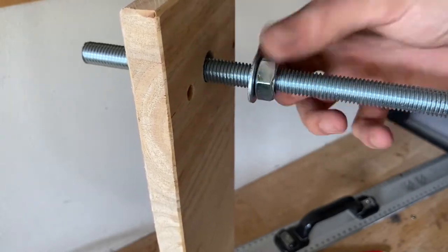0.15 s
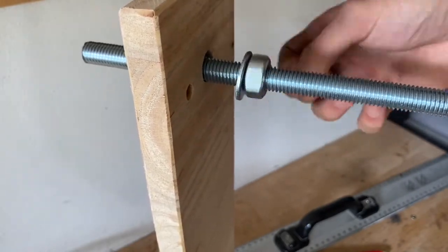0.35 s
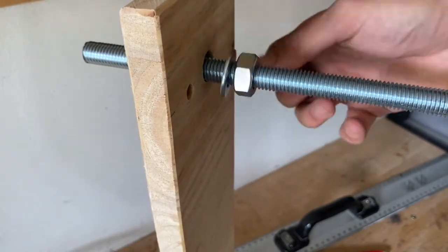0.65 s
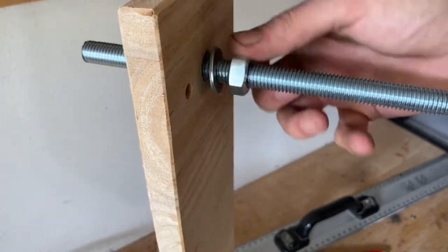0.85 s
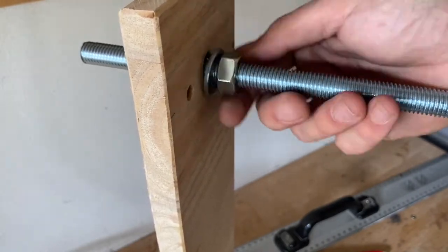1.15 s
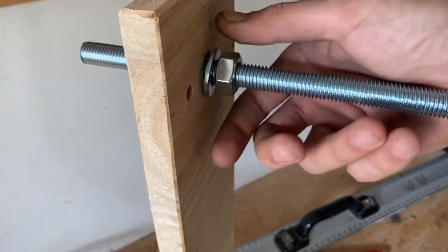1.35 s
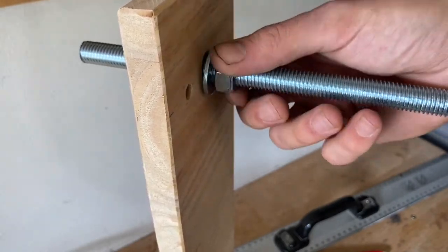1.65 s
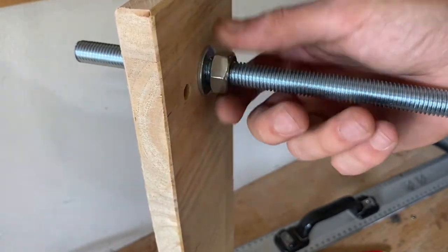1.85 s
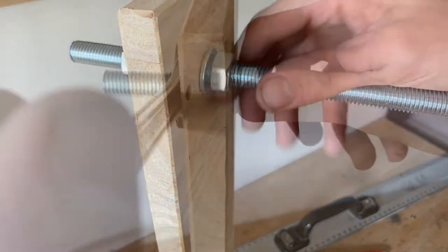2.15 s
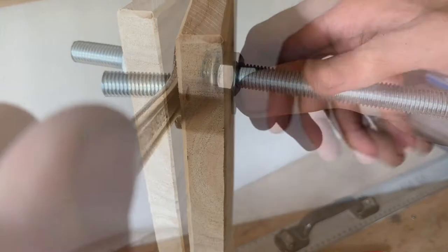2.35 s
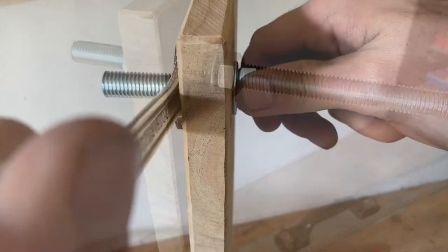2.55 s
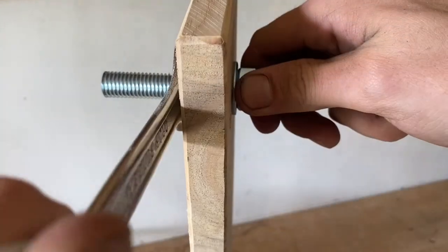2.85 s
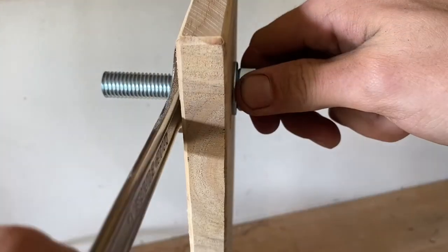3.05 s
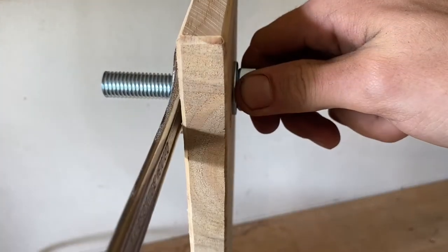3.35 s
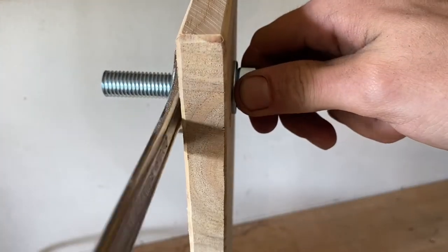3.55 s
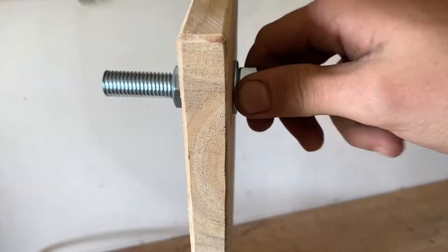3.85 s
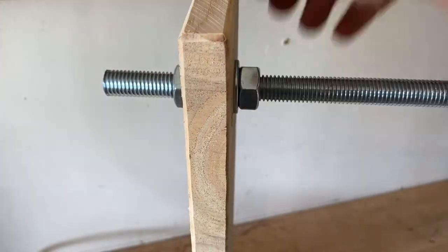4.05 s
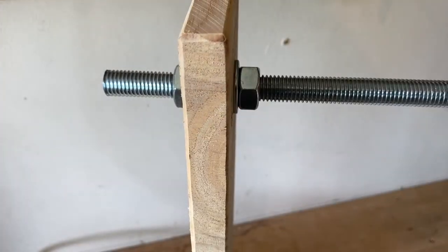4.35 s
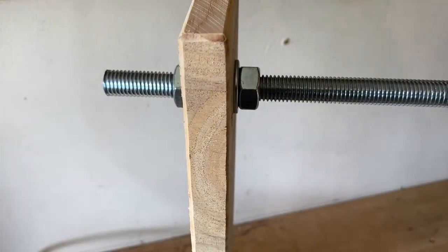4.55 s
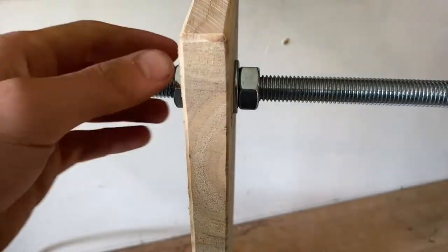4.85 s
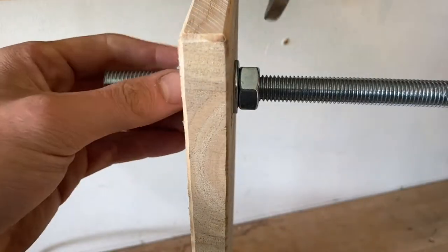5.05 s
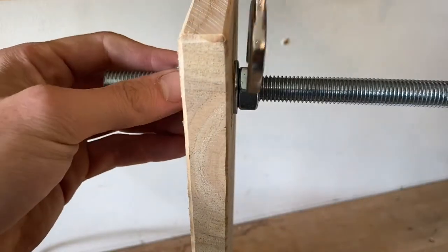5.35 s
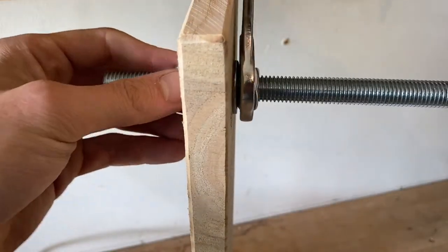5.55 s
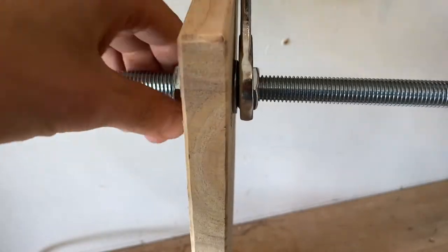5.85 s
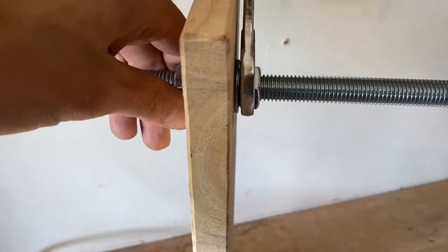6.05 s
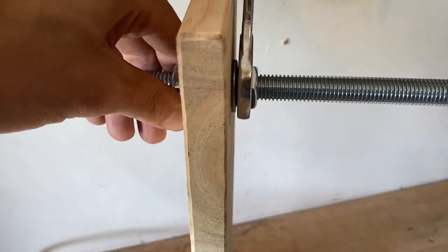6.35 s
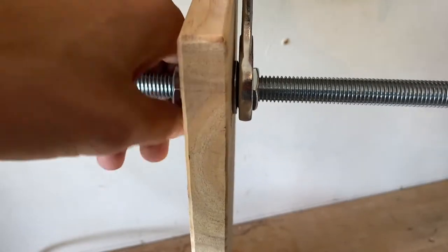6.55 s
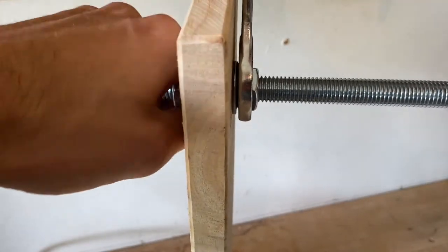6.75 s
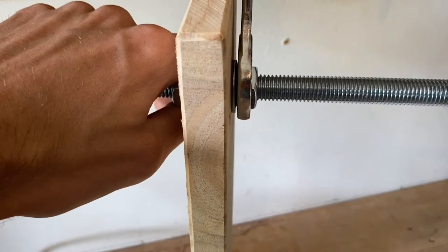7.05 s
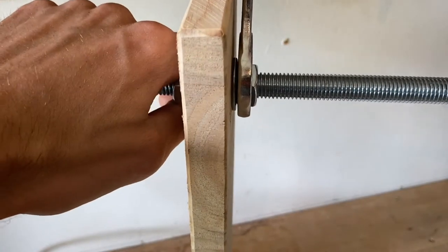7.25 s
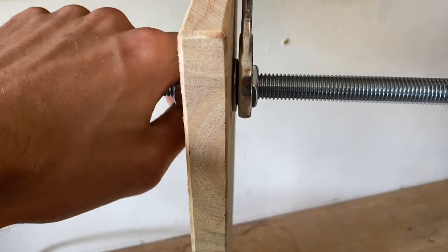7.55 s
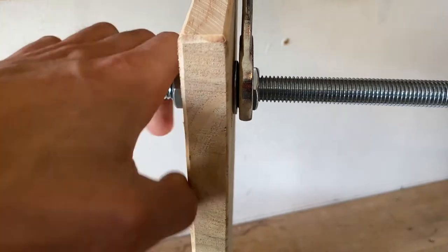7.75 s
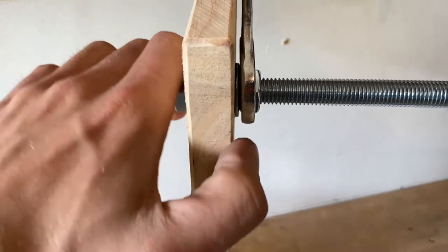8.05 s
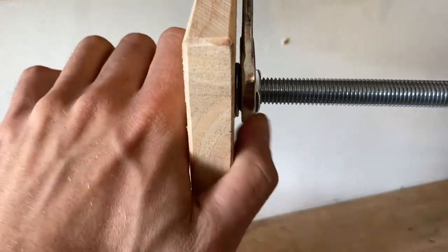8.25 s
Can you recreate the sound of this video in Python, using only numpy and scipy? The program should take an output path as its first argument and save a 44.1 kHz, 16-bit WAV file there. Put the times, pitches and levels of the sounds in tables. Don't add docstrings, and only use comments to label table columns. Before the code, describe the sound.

A steel nut and washer clatter along a threaded rod and tap wood, then after a quiet stretch a wrench rattles and clanks onto the nut.

```python
import sys
import numpy as np
from scipy import signal
from scipy.fft import rfft, irfft
from scipy.io import wavfile
from scipy.ndimage import uniform_filter1d

SR = 44100
rng = np.random.default_rng(int(sys.argv[2]) if len(sys.argv) > 2 else 0)


def output_pcm(signal):
    pcm = np.clip(np.atleast_2d(signal).T, -1, 1) * 32767
    wavfile.write(sys.argv[1], SR, np.round(pcm).astype(np.int16))


def nominal_scale(level):
    x = np.asarray(level, float) / 20
    return 10 ** x


N = 370440
T = np.arange(N) / SR


def evened(x):
    return x / np.sqrt(np.mean(x ** 2) + 1e-20)


def read(points, hz):
    f, value = np.transpose(points)
    return np.interp(np.log(hz + 1), np.log(f + 1), value)


def add(mix, s, sound):
    part = mix[round(s * SR):][:len(sound)]
    part += sound[:len(part)]


def causal(points, size=1024):
    log_gain = np.log(nominal_scale(read(points, abs(np.fft.fftfreq(4 * size, 1 / SR)))))
    taps = np.fft.ifft(np.exp(np.conj(signal.hilbert(log_gain)))).real[:size]
    return taps / np.linalg.norm(taps)


def noise(points):
    gain = nominal_scale(read(points, np.fft.rfftfreq(N, 1 / SR)))
    return evened(irfft(rfft(rng.standard_normal(N)) * gain, N))


def stroke(rows, ends_db=0):
    out = np.full(N, -140.)
    for s, length, db, *change_db in rows:
        u = np.arange(0, length, 1 / SR) / length
        out[round(s * SR):][:len(u)] = db + sum(change_db) * u + ends_db * (2 * u - 1) ** 2
    return out


def rings(modes, rise_cycles=0):
    hz, width, db = np.transpose(modes)[:, :, None]
    t = np.arange(6000) / SR
    rise = np.minimum(hz * t / (rise_cycles + 1e-6), 1)
    decay = np.exp(-np.pi * width * t)
    return nominal_scale(db) * np.sqrt(width / 60) * rise * decay * np.sin(2 * np.pi * hz * t)


def contact(ms):
    u = np.arange(2000) / SR * 1000 / ms
    shape = u ** 0.62 * np.exp(-u)
    burst = rng.standard_normal(len(u)) * shape
    for _ in range(4):
        z = rfft(burst)
        burst = irfft(z / (abs(z) + 1e-12), len(u)) * np.minimum(10 * shape, 1)
    return burst * np.linalg.norm(shape) / np.linalg.norm(burst)


def strikes(events, modes, click, dull_hz, bright_hz, free_hz, scatter_db, click_db, rise_cycles=0):
    out = np.zeros(N)
    click_taps = nominal_scale(click_db) * causal(click)
    ring = rings(modes, rise_cycles)
    ring = ring / np.linalg.norm(ring.sum(0))
    free = np.array(modes)[:, 0] > free_hz
    for s, db, dull_db, bright_db, long_db, ring_db in events:
        body = nominal_scale(scatter_db * rng.standard_normal(len(modes)) + ring_db * free) @ ring
        add(body, 0, click_taps)
        tilt = causal([(dull_hz * 0.55, dull_db), (dull_hz * 3.25, 0),
                       (bright_hz * 0.83, 0), (bright_hz * 0.89, bright_db)], size=128)
        push = contact(ms=nominal_scale(np.clip(long_db, -4, 19)))
        sound = signal.fftconvolve(np.convolve(push, tilt), body)
        add(out, s, nominal_scale(db) * sound / abs(sound).max())
    return out


def chatter(slides, modes, click, tilt, grip, per_s, spread_db, clump_db, click_db):
    out = np.zeros(N)
    start = max(round(slides[0][0] * 10) * SR // 10 - SR // 10, 0)
    stop = round(slides[-1][0] * 10) * SR // 10 + SR // 3
    level = uniform_filter1d(nominal_scale(stroke(slides)), 450)[start:stop]
    n = len(level)
    ring = rings(np.array(modes) * [1, grip, 1]) * nominal_scale(read(tilt, np.array(modes)[:, :1]))
    ring /= np.linalg.norm(ring.sum(0))
    for place in range(3):
        heights = nominal_scale(spread_db * np.minimum(rng.exponential(1, n), 3)) * rng.choice([-1, 1], n)
        ticks = (rng.random(n) < per_s / SR) * heights
        clumps = nominal_scale(clump_db * evened(uniform_filter1d(rng.standard_normal(n), 350)))
        body = ring[place::3].sum(0)
        add(body, 0, nominal_scale(click_db) * causal(click))
        add(out, start / SR, signal.oaconvolve(evened(ticks * clumps) * level, body))
    return out


def pings(table):
    out, t = np.zeros(N), np.arange(6000) / SR
    for s, db, hz, width in table:
        rate, phase = rng.random(2)
        waver = 1 + 0.35 * np.sin(2 * np.pi * (45 * (.5 + rate) * t + phase))
        swell = (1 - np.exp(-t / 0.003)) ** 2
        sound = swell * waver * rings([(hz, width, 0)])[0] * np.hanning(12001)[6001:]
        add(out, s, nominal_scale(db) * sound / abs(sound).max())
    return out


# frequency in Hz, level in dB
FIRST_HUSH_TONE = [(35, -63), (60, -9), (170, -5.5), (240, -17), (460, -13.5), (600, -26), (9130, -37),
                   (16000, -46)]


def first_hush():
    return nominal_scale(-61 + 5.5) * noise(FIRST_HUSH_TONE)


# frequency in Hz, width in Hz, level in dB
NUT = [(902, 34, 5), (1161, 48, 4.5), (1444, 70, 3.5), (2132, 103, 10), (3240, 61, -14), (3573, 60, -2.5),
       (5312, 46, -3), (5727, 57, -7), (5964, 60, -8), (6540, 88, -25), (7244, 58, -0.5), (7940, 90, -8),
       (9570, 55, -2), (9900, 110, -6), (10350, 80, -6), (11560, 80, -14), (12101, 100, 4),
       (12700, 49.5, -30), (14950, 95, 4)]
# frequency in Hz, level in dB
NUT_CLICK = [(300, 24.5), (900, -0.5), (2000, -4.5), (4000, 6), (7000, -10), (10000, -2), (14500, -34),
             (16000, -20)]
# start in seconds, peak in dB
SNAPS = [
    (0.029, -51),
    (0.1845, -44),
    (0.5767, -33.5),
    (0.6453, -27),
    (0.671, -39),
    (0.7362, -29),
    (0.818, -43),
    (0.909, -59),
    (0.998, -45),
]
# start in seconds, peak in dB, dull part in dB
KNOCKS = [(0.0659, -29, -27), (0.1309, -27, -24.5), (0.2032, -34.5, -20), (0.2195, -33, -27),
          (0.2262, -29.5, -18.5), (0.2354, -39, 6), (0.3526, -40, -12), (0.3602, -30, -16),
          (0.377, -28, -21), (0.389, -32, -20), (0.4289, -34.5, -18), (0.4903, -36, -10),
          (0.4977, -30, -7.5), (0.5212, -32.5, -28), (0.5525, -35.5, -11), (0.6285, -23.5, -22),
          (0.651, -33, -14), (0.7572, -29.5, -16), (0.7721, -31, -16), (0.883, -35, -11.5),
          (1.021, -34.5, -16), (1.048, -42, -15), (1.1035, -40, 1)]
# start in seconds, peak in dB, bright part in dB
SEATED = [
    (1.2851, -45, -8),
    (1.33, -35, 4),
    (1.925, -37, 1),
    (1.982, -35, 0),
    (2.035, -30, 5.5),
    (2.076, -52, -18),
    (2.1648, -31, 12.5),
    (2.2032, -35, 32),
    (2.2417, -40.5, 10),
    (2.2925, -48, 26),
]


def nut_knocks():
    rows = [(s, db, dull, -5, 10, 1.5 + (db + 45)) for s, db, dull in KNOCKS]
    rows += [(s, db, -10.5, bright, 11, 7) for s, db, bright in SEATED]
    rows += [(s, db, -18, 6.5, -1, 9) for s, db in SNAPS]
    return strikes(rows, NUT, NUT_CLICK, dull_hz=2780, bright_hz=11900, free_hz=0, scatter_db=3.5, click_db=13.0)


# start in seconds, length in seconds, chatter in dB, change to the end in dB
SPINS = [(.056, 0.1, -51.5, 0), (.195, 0.1, -51.5, -6), (.346, 0.11, -51.5, 1), (.48, 0.17, -50, -10),
         (.61, 0.12, -46.5, -7.5), (.75, 0.098, -44, -20.5), (.87, 0.07, -55.5, -2.5),
         (1.01, 0.094, -54.5, -0.5), (1.155, 0.035, -49.5, -2.5), (1.28, 0.075, -59, 0),
         (1.59, 0.14, -67, 2), (1.99, 0.11, -61.5, 3), (2.2, 0.11, -57, -1)]
# frequency in Hz, level in dB
SPIN_TILT = [(800, 4.5), (2200, -1), (4500, 14), (8000, 7.5), (15000, 6)]


def nut_spins():
    return chatter(SPINS, NUT, NUT_CLICK, SPIN_TILT, grip=1.4, per_s=5000,
                   spread_db=2.0, clump_db=5.5, click_db=-12.0)


# start in seconds, peak in dB
PUSHES = [(0.046, -31), (0.233, -47), (0.327, -32.5), (0.374, -33), (0.467, -33.5), (0.615, -46),
          (0.78, -35), (0.892, -35.5), (0.939, -40.5), (1.001, -37), (1.037, -34.5), (1.156, -56),
          (1.279, -42), (1.472, -44.5), (1.682, -49), (1.808, -40.5), (1.878, -41), (1.977, -38.5),
          (2.034, -38), (2.173, -38)]
# frequency in Hz, width in Hz, level in dB
BOARD = [(127, 79, -5.5), (248, 26, -5.5), (405, 150, -2.5), (620, 30, -19)]


def board():
    tremor = nominal_scale(stroke(SPINS) - 17.5) + nominal_scale(-87.0)
    drive = uniform_filter1d(tremor, 900) * rng.standard_normal(N)
    for s, db in PUSHES:
        add(drive, s, nominal_scale(db - 22.0) * contact(ms=10.6))
    return signal.oaconvolve(drive, rings(BOARD).sum(0))[:N]


# start in seconds, peak in dB, dull part in dB
SLAPS = [
    (1.171, -23.5, -12),
    (1.2356, -44, 19),
    (1.314, -23, -14),
    (1.381, -43, 6),
    (1.439, -54, 1),
    (1.8128, -43.5, -2),
    (2.1904, -30, -5.5),
]
# frequency in Hz, level in dB
SLAP_CLICK = [(290, -64), (500, -4), (2610, -7), (2980, 1.5), (4470, -11.5), (7420, -7), (10500, -6.5),
              (13400, -38), (16000, -6)]


def washer_slaps():
    rows = [(s, db, dull, -21 + 0.75 * (db + 45), 6.5, -11.5) for s, db, dull in SLAPS]
    return strikes(rows, NUT, SLAP_CLICK, dull_hz=2640, bright_hz=10800, free_hz=0, scatter_db=11.0, click_db=-3.0)


# start in seconds, peak in dB, frequency in Hz, width in Hz
ROD_PINGS = [(1.603, -59, 2050, 40), (1.617, -59, 2170, 30), (2.05, -53, 5290, 40), (2.037, -42, 1420, 50),
             (2.192, -46, 4000, 90), (2.25, -58, 5250, 30), (2.21, -54, 3570, 30), (2.24, -55, 1120, 12),
             (2.215, -55, 900, 20), (2.225, -59, 2170, 12), (2.372, -63, 1120, 14), (2.29, -61, 2090, 10),
             (2.33, -63, 2050, 7)]


def rod_pings():
    return pings(ROD_PINGS)


# frequency in Hz, level in dB
SECOND_HUSH_TONE = [(110, -20.5), (230, -5), (1100, -20.5), (2700, -18.5), (7470, -28.5), (9100, -41),
                    (11300, -38), (16000, -49)]
# time in seconds, level in dB
SECOND_HUSH_DB = [(2, -65), (3.2, -64), (5.3, -66.5), (8.4, -65.5)]
# frequency in Hz, level in dB
RUMBLE_TONE = [(12, -47), (20, -42), (48, -3), (97, -1), (134, -6.5), (157, -14.5), (247, -11), (300, -45),
               (390, -19), (660, -120)]
# time in seconds, level in dB
RUMBLE_DB = [(1.9, -55.5), (4.16, -52.5), (5.19, -53.5), (6.75, -49), (7.17, -54.5), (8.4, -49)]


def second_hush():
    hush = nominal_scale(np.interp(T, *np.transpose(SECOND_HUSH_DB)))
    rumble = nominal_scale(np.interp(T, *np.transpose(RUMBLE_DB)))
    return nominal_scale(4.0) * hush * noise(SECOND_HUSH_TONE) + rumble * noise(RUMBLE_TONE)


# start in seconds, peak in dB, pitch in Hz
THUMPS = [(2.489, -37, 82), (3.851, -47, 68.3), (5.59, -37.5, 92), (5.734, -34, 86.2), (5.792, -40, 72),
          (6.129, -40.5, 120), (6.258, -36.5, 84.6), (6.417, -23, 87.9), (6.543, -33, 106),
          (6.567, -34, 66), (6.607, -39.5, 76), (6.734, -26, 88.7), (6.791, -35, 124), (6.813, -35, 70),
          (6.866, -32.5, 77.5), (6.891, -36.5, 107.3), (6.923, -39.5, 65), (7.822, -40, 63.6),
          (7.88, -42, 124), (8.055, -37, 84.4), (8.31, -31.5, 139.8), (8.327, -35.5, 70)]


def bench():
    out, t = np.zeros(N), np.arange(12000) / SR
    for s, db, last_hz in THUMPS:
        turns = np.cumsum(last_hz * (0.743 + 1.4 * np.exp(-t / 0.00936))) / SR
        blow = np.exp(-((t - .022) / 0.023) ** 2)
        blow += nominal_scale(-11 - 60 * t / 0.071) * np.minimum(t / 0.021, 1)
        upper = nominal_scale(-3.5 - 60 * t / 0.27) * np.minimum(t / 0.023, 1)
        upper *= np.sin(2 * np.pi * (1.89 * turns + rng.random()))
        onset = np.minimum(t / 0.0079, 1)
        add(out, s - .004, nominal_scale(db) * onset * (blow * np.sin(2 * np.pi * turns) + upper))
    return out


def crowded(modes, crowd_db, count=70):
    hz = rng.uniform(20, 91.87, count) ** 2
    f, width, db = np.transpose(modes)
    weak_db = np.interp(hz, f, uniform_filter1d(db, size=5)) + crowd_db + 3 * rng.standard_normal(count)
    return np.vstack([modes, np.transpose([hz, 45 + hz / 90, weak_db])])


# frequency in Hz, level in dB
WRENCH_CLICK = [(120, -15), (200, -8.5), (950, 0.5), (1530, -7.5), (1740, 1.5), (3560, -6), (7010, -15.5),
                (8580, -26), (12600, -29), (15000, -42.5)]


def handled(blows, slides, modes, tilt, grip, long_db, click_db, scrape_db, crowd_db, ticks=()):
    modes = crowded(modes, crowd_db)
    rows = [(s, db, dull, bright, long_db, ring) for s, db, dull, bright, ring in blows]
    rows += [(s, db, -13.5, 0, 3, 0) for s, db in ticks]
    struck = strikes(rows, modes, WRENCH_CLICK, dull_hz=1250, bright_hz=6460, free_hz=4010,
                     scatter_db=3.0, click_db=click_db, rise_cycles=4.4)
    scraped = chatter(slides, modes, WRENCH_CLICK, tilt, grip=grip, per_s=4000,
                      spread_db=5.0, clump_db=2.0, click_db=scrape_db)
    return struck + scraped


# frequency in Hz, width in Hz, level in dB
SLIP = [(490, 140, 2), (660, 13, 1), (885, 41, 0), (1230, 13, -3), (1390, 41, -1), (1710, 100, -7),
        (1980, 160, -10), (2130, 36, -15), (3130, 58, -4), (3680, 170, -8), (4060, 110, -1.5),
        (4900, 84, -14), (5220, 57, -3.5), (5420, 39, -10), (6000, 40, -34), (7600, 91, -7),
        (11200, 47, -41), (12300, 160, -32), (15100, 32, -23), (15700, 26, -50)]
# start in seconds, peak in dB, dull part in dB, bright part in dB, free ring in dB
SLIP_BLOWS = [
    (3.5658, -27.5, -11, -7, 2),
    (3.5884, -35.5, 18, -19, -6),
    (3.604, -55, 19, -4, -4),
    (3.6595, -40, -22, -13, -8),
]
# start in seconds, length in seconds, chatter in dB, change to the end in dB
SLIP_SLIDES = [
    (3.585, 0.12, -41.5, -15),
]
# frequency in Hz, level in dB
SLIP_TILT = [(500, 1), (1300, 5), (3200, 11), (6000, -2), (12000, -15)]


def wrench_slips():
    return handled(SLIP_BLOWS, SLIP_SLIDES, SLIP, SLIP_TILT, grip=0.8, long_db=8.5,
                   click_db=-2.5, scrape_db=-8.5, crowd_db=-8.0)


# start in seconds, peak in dB,
# frequency in Hz, width in Hz
WRENCH_PINGS = [(3.567, -40, 1860, 90), (3.628, -46, 5470, 40), (3.632, -62, 15100, 14),
                (3.586, -62, 12300, 20), (3.677, -65, 11200, 25), (3.683, -43, 5470, 55),
                (5.382, -44, 12273, 11), (5.405, -61, 10250, 20), (5.484, -65, 15116, 20),
                (5.54, -41, 9173, 12), (5.522, -55, 11500, 30), (5.972, -40, 1600, 40),
                (6.046, -53, 5450, 5), (6.044, -47, 4010, 30), (5.99, -54, 4010, 12),
                (6.157, -44, 4000, 22), (3.64, -63, 12300, 20), (6.044, -57, 7670, 4),
                (6.048, -52, 3100, 4.5), (6.108, -34, 7670, 26), (6.108, -25, 4000, 32),
                (5.957, -40, 4020, 30), (5.523, -23, 668, 45), (6.136, -27, 655, 50), (3.587, -40, 640, 35),
                (3.668, -50, 5470, 25), (5.528, -35, 5450, 70), (3.566, -45, 4080, 45),
                (6.165, -54, 5450, 6), (6.17, -58, 7670, 5), (5.521, -45, 12273, 26),
                (3.592, -60, 7670, 30), (3.614, -59, 7670, 25), (3.646, -59, 7670, 40),
                (3.677, -60, 7670, 30), (5.383, -52, 6830, 30)]


def wrench_pings():
    return pings(WRENCH_PINGS)


# start in seconds, length in seconds, level in dB
RUBS = [
    (4.81, .08, -87),
    (6.57, 0.053, -79),
    (6.67, 0.076, -88),
    (6.87, 0.11, -90.5),
    (7.68, 0.19, -83.5),
    (8.04, 0.13, -90.5),
    (8.25, 0.033, -90),
]
# frequency in Hz, level in dB
RUB_TONE = [(1200, 10), (2500, -10.5), (4500, 9), (7500, 3.5), (10000, 0.5), (15500, -2.5), (17000, -20)]
# frequency in Hz, width in Hz, level in dB
FINGERTIPS = [(2400, 150, -1.5), (3040, 100, -0.5), (3580, 250, -2), (4980, 300, -6)]
# start in seconds, length in seconds, level in dB, change to the end in dB
DRAG = [
    (7.7, 0.141, -66, 7),
]


def hands():
    grain = nominal_scale(1.7 * evened(uniform_filter1d(rng.standard_normal(N), 90)))
    squeak = signal.oaconvolve(grain ** 2 * rng.standard_normal(N), rings(FINGERTIPS).sum(0))[:N]
    rub_level = uniform_filter1d(nominal_scale(stroke(RUBS, ends_db=-5) + 17), 600)
    drag_level = uniform_filter1d(nominal_scale(stroke(DRAG)), 300)
    return rub_level * grain * noise(RUB_TONE) + drag_level * evened(squeak)


# frequency in Hz, width in Hz, level in dB
JAWS = [(502, 16, -2), (870, 110, 15.5), (1243, 66, 1.5), (1680, 180, 1), (2070, 25, -25), (2475, 155, -3),
        (3030, 300, -1), (3130, 85, -1), (3353, 120, 1), (3500, 70, -6), (4000, 190, -8), (4520, 40, -30),
        (5450, 47, -13), (5700, 66, -9.5), (6810, 50, -18), (7690, 45, -38.5), (10000, 69, -39),
        (12200, 31, -31), (13900, 170, -32), (15116, 63, -33)]
# start in seconds, peak in dB, dull part in dB, bright part in dB, free ring in dB
JAW_BLOWS = [
    (5.3822, -22, -16, 1, 0),
    (5.3885, -35, 23, -13, -3),
    (5.4128, -26, -1, 1, 3),
    (5.4185, -35.5, 21, -11, -12),
    (5.655, -32, -12, -28, -1),
]
# start in seconds, peak in dB
JAW_TICKS = [(5.4265, -35), (5.431, -36), (5.4365, -43), (5.4815, -36), (5.4855, -37.5), (5.4945, -29),
             (5.4995, -31), (5.503, -31), (5.508, -34), (5.513, -32.5), (7.1711, -49)]
# start in seconds, length in seconds, chatter in dB, change to the end in dB
JAW_SLIDES = [
    (5.388, 0.019, -33.5, -8),
    (5.415, 0.067, -41.5, -12),
    (5.478, 0.076, -45, 8),
    (5.66, 0.054, -54.5, -11.5),
]
# frequency in Hz, level in dB
EVEN_TILT = [(500, 2), (1500, 9), (3200, 9), (6000, -1), (12000, -11)]


def jaws_rattle():
    return handled(JAW_BLOWS, JAW_SLIDES, JAWS, EVEN_TILT, grip=1.1, long_db=4.0,
                   click_db=-8.5, scrape_db=-15.0, crowd_db=-7.0, ticks=JAW_TICKS)


# start in seconds, peak in dB, frequency in Hz, width in Hz
ANSWERS = [(5.384, -37, 1225, 55), (5.4115, -44, 3060, 130), (5.4125, -41, 2460, 90), (5.416, -40, 867, 69),
           (5.484, -44, 2920, 150), (5.521, -23, 1726, 47), (5.545, -44, 1680, 11), (5.56, -43, 2480, 13),
           (5.575, -50.5, 4850, 16), (5.665, -43.5, 477, 18), (5.99, -41.5, 197, 13),
           (6.133, -17.5, 1843, 180), (6.15, -41.5, 446, 13)]


def board_answers():
    return pings(ANSWERS)


# frequency in Hz, width in Hz, level in dB
CLANK = [(714, 60, -33.5), (1004, 45, -1), (1230, 60, -1), (1760, 45, -40), (1810, 70, 2), (2294, 75, 8.5),
         (2480, 60, 2), (2760, 51, -19), (3290, 130, -19), (3620, 97, 5.5), (3690, 54, -4), (3730, 41, -4),
         (4370, 40, -14), (4870, 100, -2.5), (5380, 67, -19), (5780, 40, -23.5), (6830, 30, -28),
         (7900, 60, -35), (9170, 33, -31), (10260, 40, -27), (11500, 50, -32), (12280, 25, -21)]
# start in seconds, peak in dB, dull part in dB, bright part in dB, free ring in dB
CLANK_BLOWS = [
    (5.5192, -6, -6, -6.5, -3),
    (5.5284, -19, 14, -14, -1.5),
    (6.1333, -11, -3, -8.5, 2),
]
# start in seconds, length in seconds, chatter in dB, change to the end in dB
CLANK_SLIDES = [
    (5.535, 0.2, -43, -22),
    (6.145, 0.13, -41.5, -24),
]


def wrench_drops_home():
    return handled(CLANK_BLOWS, CLANK_SLIDES, CLANK, EVEN_TILT, grip=1.3, long_db=9.0,
                   click_db=5.0, scrape_db=-11.5, crowd_db=0.5)


# frequency in Hz, width in Hz, level in dB
WRENCH = [(510, 63, 1), (640, 67, -22), (881, 25, 0.5), (1040, 84, -4), (1200, 35, 2), (1403, 44, 1.5),
          (1710, 74, -11), (1800, 110, -8), (2170, 200, -32), (2580, 51, -8), (3060, 61, -3.5),
          (3430, 60, -22.5), (3460, 130, -10), (3970, 260, -11), (4160, 79, -13), (4820, 78, -19),
          (5380, 150, -12.5), (5860, 50, -11.5), (6730, 54, -21), (8000, 60, -27), (8700, 50, -21),
          (11400, 45, -26), (12360, 47, -25), (15100, 41, -46)]
# start in seconds, peak in dB, dull part in dB, bright part in dB, free ring in dB
BLOWS = [
    (5.9585, -33, -19, -14, 5),
    (5.9773, -36, 0, -25, -18),
    (6.0446, -40, -24, -27, -9),
    (6.1026, -26.5, -17, -2, -10),
    (6.1102, -18.5, -32, -3.5, 6),
    (6.1194, -18.5, -17, -4, 6),
]
# start in seconds, length in seconds, chatter in dB, change to the end in dB
SLIDES = [
    (5.961, 0.065, -45, -15),
    (6.043, 0.14, -46, -26),
    (6.104, 0.029, -39.5, 6.5),
]
# frequency in Hz, level in dB
SLIDE_TILT = [(500, -3), (1500, -4), (3200, -3), (9000, -8), (15000, -5)]


def wrench_knocks():
    return handled(BLOWS, SLIDES, WRENCH, SLIDE_TILT, grip=1.4, long_db=9,
                   click_db=-1.0, scrape_db=-26.0, crowd_db=-6.0)


# frequency in Hz, time to fall 60 dB in seconds
ROOM = [(300, 0.28), (1500, 0.15), (5000, 0.14), (14000, 0.099)]


def room(x, wet_db):
    taps = np.zeros(SR // 2)
    at = np.arange(250, len(taps) - 20, 20)
    taps[at + rng.integers(0, 20, len(at))] = rng.choice([-1., 1.], len(at))
    hz, t, z = signal.stft(taps, SR, nperseg=256)
    tail = signal.istft(z * nominal_scale(-60 * t / read(ROOM, hz)[:, None]), SR, nperseg=256)[1]
    return nominal_scale(wet_db) * signal.oaconvolve(x, tail / np.linalg.norm(tail))[:N]


def ports(direct, diffuse, side_db, nulls, low_cut_hz, direct_db, lean=((100, 0), (200, 0))):
    hz = np.fft.rfftfreq(N, 1 / SR)
    low_cut = 1 / (1 + (low_cut_hz / (hz + 1)) ** 8) ** .5
    loss_db = 0 * hz
    for f, width, depth_db in nulls:
        loss_db = loss_db + depth_db * np.exp(-((hz - f) / width) ** 2)
    mid = rfft(direct + diffuse()) * nominal_scale(-loss_db)
    side = 1j * nominal_scale(direct_db) * rfft(direct) + rfft(diffuse())
    side = side * nominal_scale(read(side_db, hz)) + mid * np.tanh(read(lean, hz) * np.log(10) / 40)
    return irfft(low_cut * np.array([mid + side, mid - side]), N)


DISSOLVE = (1.92, 2.7)
# frequency in Hz, side against mid in dB
FIRST_SIDE = [(60, -25), (200, -16.5), (700, -2.5), (1300, -1), (2400, 1), (3800, -4.5), (5000, -14.5),
              (8000, -19.5), (13500, -13), (15000, -3.5)]
SECOND_SIDE = [(60, -21), (200, -10.5), (400, -4), (900, 4), (1500, 2), (2400, -15), (4400, -22),
               (7200, -18), (8600, 10), (10300, 1), (11200, -25), (12300, 2.5), (14200, 4), (15000, -37)]
# frequency in Hz, width in Hz, depth in dB
SECOND_NULLS = [(9120, 330, 24), (13350, 480, 24)]
# frequency in Hz, left over right in dB
SECOND_LEAN = [(60, -1), (130, 2), (290, 0.5), (640, 0.5), (1410, -0.5), (3100, 2), (6820, -0.5),
               (15000, 1.5)]


def scene():
    fade = np.clip((T - DISSOLVE[0]) / (DISSOLVE[1] - DISSOLVE[0]), 0, 1)
    nut = nut_knocks() + nut_spins() + washer_slaps() + rod_pings()
    wrench = wrench_slips() + wrench_pings() + jaws_rattle() + wrench_drops_home() + wrench_knocks()

    def first_air():
        return room(nut, wet_db=-13.0) + (1 - fade) * first_hush()

    def second_air():
        return room(wrench, wet_db=-16.0) + fade * second_hush()

    first_direct = nut + (1 - fade ** 3) * board()
    second_direct = wrench + hands() + bench() + board_answers()
    first = ports(first_direct, first_air, FIRST_SIDE, [], low_cut_hz=108.0, direct_db=-6.0)
    second = ports(second_direct, second_air, SECOND_SIDE, SECOND_NULLS, low_cut_hz=38, direct_db=-5.5,
                   lean=SECOND_LEAN)
    return first + second


def top_cut(x):
    return signal.sosfilt(signal.butter(12, 16820, fs=SR, output="sos"), x)


def record(dry):
    ceiling, edge_hz = 0.6, 15750
    squeezed = ceiling * np.tanh(dry / ceiling)
    mix = signal.oaconvolve(squeezed, signal.firwin(255, edge_hz, fs=SR)[None], "same")
    return top_cut(mix)


dry = scene()
out = record(dry)
output_pcm(out)
```